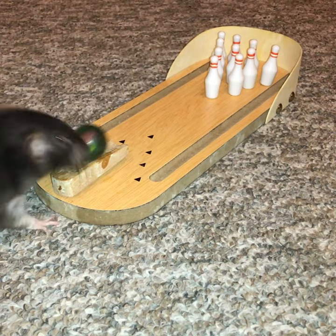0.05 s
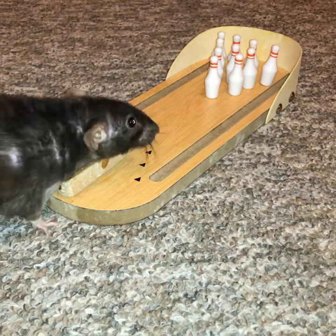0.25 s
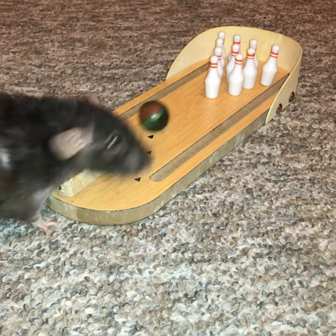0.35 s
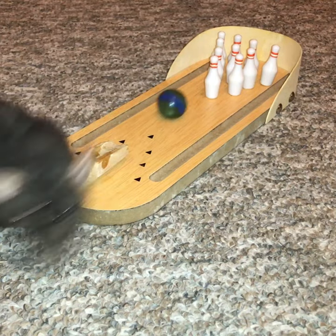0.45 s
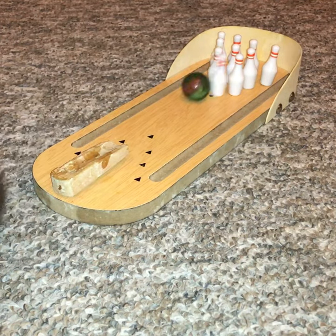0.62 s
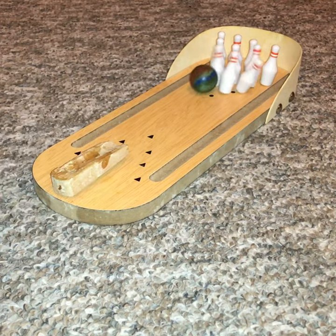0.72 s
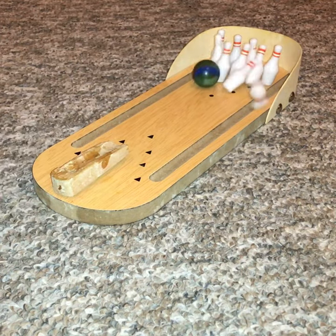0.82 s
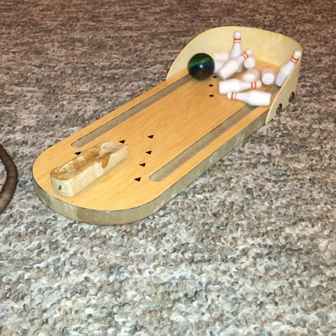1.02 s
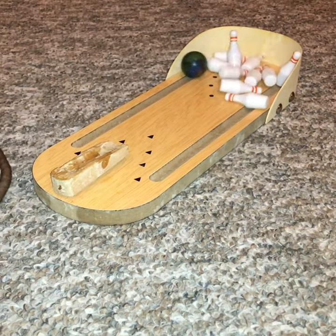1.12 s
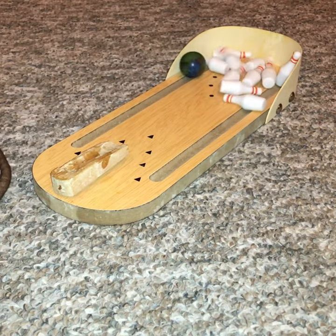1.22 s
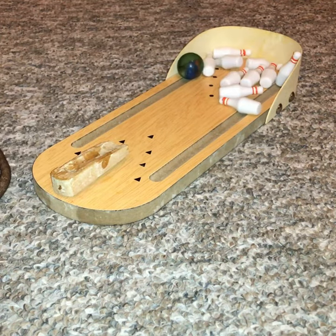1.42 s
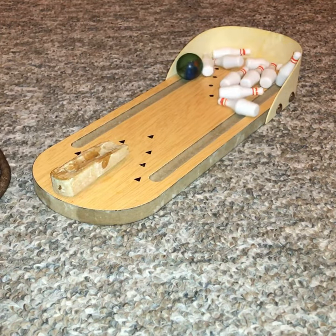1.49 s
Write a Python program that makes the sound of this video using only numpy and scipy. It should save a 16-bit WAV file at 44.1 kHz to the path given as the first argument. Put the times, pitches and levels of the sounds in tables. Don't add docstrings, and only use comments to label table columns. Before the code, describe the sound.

Tabletop-size bowling heard up close in a quiet room: soft animal shuffling on carpet, a sharp wooden knock with shrinking bounces, brief rolling and claw ticks, then wooden pins clack, tumble and settle.

```python
import sys
import numpy as np
from scipy import signal
from scipy.fft import rfft, irfft
from scipy.io import wavfile
from scipy.ndimage import uniform_filter1d

SR = 44100
rng = np.random.default_rng(int(sys.argv[2]) if len(sys.argv) > 2 else 0)


def decibels_to_gain(level_db):
    exponent = np.asarray(level_db, float) / 20
    return 10 ** exponent


def transcribe(u):
    v = np.clip(np.atleast_2d(u).T, -1, 1)
    q = np.round(v * 32767).astype(np.int16)
    wavfile.write(sys.argv[1], SR, q)


N = 68355

# (frequency [Hz], level [dB])
LANE_MODES = [(135, -20), (230, -19), (320, -18), (405, -9.5), (646, -8.5), (1035, -2.5), (1500, -3),
              (1800, -5.5), (2300, -6), (2900, -6), (3155, 1), (3450, -3), (3950, -11.5), (4700, -12.5)]


def evened(x):
    return x / np.sqrt(np.mean(x ** 2) + 1e-20)


def read(points, hz):
    f, value = np.transpose(points)
    return np.interp(np.log(hz + 1), np.log(f + 1), value)


def level(curve):
    s, db = np.transpose(curve)
    return decibels_to_gain(np.interp(np.arange(N) / SR, s, db, -150, -150))


def add(mix, s, sound):
    part = mix[round(s * SR):][:len(sound)]
    part += sound[:len(part)]


def coloured(tone):
    spectrum = rfft(rng.standard_normal(N))
    return evened(irfft(spectrum * decibels_to_gain(read(tone, np.fft.rfftfreq(N, 1 / SR))), N))


def wander(smooth):
    return evened(uniform_filter1d(rng.standard_normal(N), size=smooth))


def band_noise(count, low_hz, high_hz):
    b, a = signal.butter(3, [low_hz, high_hz], "band", fs=SR)
    return signal.lfilter(b, a, rng.standard_normal(count))


def ring(modes, t60_s, ref_hz, spread_db, detune, chatter):
    damping, chatter_s = 0.2, 0.002
    t = np.arange(2048)[:, None] / SR
    hz, db = np.transpose(modes)
    strength, shift, phase = rng.standard_normal((len(modes), 3)).T
    t60 = t60_s * (hz / ref_hz) ** -damping
    decay = decibels_to_gain(db + spread_db * strength - 60 * t / t60)
    onset = np.minimum(t * np.maximum(hz * 0.5, 450), 1)
    turn = 2 * np.pi * hz * (1 + detune * shift) * t + 0.5 * phase
    x = (decay * np.sin(turn) * onset).sum(1)
    touch = chatter * rng.standard_normal(256) * np.exp(-t[:256, 0] / chatter_s)
    touch *= rng.random(256) < 0.1
    touch[0] = 1
    x = np.convolve(x, touch)
    return x / abs(x).max()


def crack(length_s, low_hz=5500, high_hz=13500):
    t = np.arange(1024) / SR
    x = band_noise(1024, low_hz, high_hz) * np.exp(-t / length_s * 2)
    return x / abs(x).max()


def ping(hz, t60_s):
    t = np.arange(4096) / SR
    return decibels_to_gain(-60 * t / t60_s) * np.minimum(t / 0.00057, 1) * np.sin(2 * np.pi * hz * t)


def struck(modes):
    squash_s, rebound_s, rebound_db = 0.0017, 0.002638, -8.5
    t = np.arange(4096)[:, None] / SR
    hz, db, t60 = np.transpose(modes)
    tones = np.sin(2 * np.pi * (hz * t + rng.random(len(hz))))
    x = (decibels_to_gain(db - 60 * t / t60) * tones).sum(1) * np.minimum(t[:, 0] / squash_s, 1)
    b, a = signal.butter(2, 2400, "high", fs=SR)
    second = signal.lfilter(b, a, x)[:-200]
    add(x, rebound_s, decibels_to_gain(rebound_db) * second)
    return x / abs(x).max()


def still_air():
    # (frequency [Hz], level [dB])
    air_tone = [(100, -6), (600, -14), (1300, -20), (3000, -23), (8000, -25), (14000, -31.5), (16000, -36)]
    air_db, rise_db = -72.5, 6
    return decibels_to_gain(air_db + rise_db * (np.arange(N) / N - 1.0)) * coloured(air_tone)


def shuffle():
    # (time [s], level [dB])
    shuffle_curve = [
        (0, -64.5),
        (.17, -66.5),
        (.6, -68.5),
        (1.0, -68),
        (1.4, -74),
        (1.55, -75.5),
    ]
    # (frequency [Hz], level [dB])
    carpet_tone = [(30, -15), (60, -4), (120, 8), (200, 4.5), (330, 2.5), (500, -2.5), (1500, -46)]
    lumps = decibels_to_gain(2.5 * wander(600))
    return level(shuffle_curve) * evened(lumps * coloured(carpet_tone))


def claws():
    # (time [s], peak level [dB], centre frequency [Hz])
    claw_ticks = [(.596, -43.5, 7660), (0.5969, -44, 3780), (0.6228, -49, 4860), (0.6523, -50, 3600),
                  (0.662, -49, 5340), (.691, -49.5, 3860), (.705, -58, 2470), (0.733, -42.5, 4330),
                  (0.7422, -50, 4400), (0.763, -48.5, 3900), (0.769, -48, 3670)]
    out, t = np.zeros(N), np.arange(512) / SR
    for s, db, hz in claw_ticks:
        tick = np.sin(2 * np.pi * hz * t) * t / 0.00033 * np.exp(1 - t / 0.00019)
        grit = band_noise(512, hz * 0.3, hz * 1.5) * np.exp(-t / 0.0015)
        add(out, s, decibels_to_gain(db) * (tick + 0.5 * grit))
    return out


def roll():
    # (time [s], level [dB])
    roll_curve = [(.06, -85), (.19, -77.5), (.225, -68), (.36, -59.5), (.45, -65), (.65, -65), (.78, -71),
                  (1.3, -62), (1.40, -68)]
    # (frequency [Hz], level [dB])
    rub_tone = [(150, -0.5), (400, 4), (750, 11.5), (1800, -3), (2400, -5), (3200, -15), (6000, -16),
                (9000, -43)]
    body_db, lane_t60_s = -9, 0.063
    lane = ring(LANE_MODES, lane_t60_s, 1000, 3.0, 0.0061, 0)
    body = evened(signal.oaconvolve(rng.standard_normal(N), lane)[:N])
    z = signal.stft(coloured(rub_tone) + decibels_to_gain(body_db) * body, nperseg=512)[2]
    patches = uniform_filter1d(rng.standard_normal(z.shape), size=3, axis=0)
    patches = evened(uniform_filter1d(patches, size=4, axis=1))
    rubbing = signal.istft(z * decibels_to_gain(3.5 * patches), nperseg=512)[1][:N]
    bumps = decibels_to_gain(1.8 * wander(150))
    return level(roll_curve) * bumps * rubbing


def pin(top_db=0):
    # (frequency [Hz], level [dB])
    pin_modes = [(2030, -9), (2500, -8), (2975, -4.5), (3220, -2), (3430, -11), (4010, -0.5), (4110, -3),
                 (4670, -9), (5130, -5), (5600, -15)]
    modes = [(hz, db + top_db * (hz > 3700)) for hz, db in pin_modes]
    return ring(modes, 0.025 * rng.uniform(0.7, 1.2), 4000, 2.5, 0.007, 0.1)


def rattle(count=16):
    # (time [s], level [dB])
    rattle_curve = [(.795, -46), (.9, -52), (1.0, -39), (1.07, -46.5), (1.2, -47), (1.33, -58), (1.38, -56),
                    (1.40, -97)]
    touches_per_s, spread_db = 610, 4.0
    size = decibels_to_gain(spread_db * np.minimum(rng.exponential(1, N), 4))
    size *= rng.random(N) < touches_per_s / SR
    which, out = rng.integers(0, count, N), np.zeros(N)
    for k in range(count):
        tap = pin() + decibels_to_gain(6.5) * ring(LANE_MODES[1:9], 0.0087, 1100, 2.75, 0.097, 0.14)
        add(tap, 0, decibels_to_gain(-36) * crack(0.002))
        add(tap, 0, decibels_to_gain(-0.5) * crack(0.0054, low_hz=1080, high_hz=6040))
        out += signal.oaconvolve(size * (which == k), tap)[:N]
    return level(rattle_curve) * evened(out)


def pins():
    # (time [s], peak level [dB], crack share [dB], upper modes [dB])
    clacks = [(.7965, -27.5, -12, -4), (.8128, -27, -16, -4), (.8214, -30, -6.5, 0), (.8355, -36, -28, -10),
              (.8432, -25, -32, -1.5), (.8495, -22, -15, 4.5), (.8836, -20, -17, 0.5),
              (.9068, -32.5, -14, 5), (.9247, -26, -20, -2), (.931, -24, -17, -9), (.9548, -25, -7.5, -8),
              (.9585, -29.5, -21, -1), (.9692, -34, -12, -7.5), (.9735, -27.5, -7, -1),
              (.9765, -28, -5, -13), (.9831, -13.5, -19.5, 6.5), (1.0012, -37, -21, -8.5),
              (1.0045, -26, -18, 3), (1.0085, -33, -9, -4), (1.0125, -23.5, -29, -4),
              (1.016, -38, -20.5, -9.5), (1.022, -23, -8.5, -7), (1.0255, -29, -18, -8),
              (1.0346, -20.5, -22, -3.5), (1.039, -25.5, -27, 2), (1.0497, -26, -23, -3),
              (1.059, -31, -37, 2), (1.0744, -14.5, -26.5, -2.5), (1.1112, -28.5, -14, -11),
              (1.114, -39, -14, 9), (1.124, -36.5, -8, -21), (1.135, -19.5, -25, -6.5),
              (1.1395, -29, -16, 19), (1.153, -36.5, -17, -2)]
    # (time [s], peak level [dB], crack share [dB], upper modes [dB])
    falls = [(1.1745, -21, -24, -6.5), (1.194, -32, -33, 3), (1.2003, -24.5, -18, 0.5),
             (1.204, -32.5, -20, -2), (1.2253, -26.5, -24, 2), (1.2374, -19, -32, 2), (1.2512, -30, -13, 2),
             (1.2646, -22.5, -21, 3), (1.272, -37, 1.5, -21), (1.2946, -27.5, -31, -1),
             (1.309, -32.5, -29, -3.5), (1.3228, -29.5, -37, 3), (1.342, -39.5, -36, -10)]
    # (time [s], peak level [dB], frequency of the answering mode [Hz])
    touches = [(0.859, -43, 3230), (0.8707, -48, 3400), (0.8736, -47, 3980), (0.9, -34, 5200),
               (0.9166, -43, 4130), (0.9225, -33, 1500), (0.9416, -33, 3080), (0.9468, -30, 3220),
               (0.9628, -29, 4000), (0.9666, -32, 1360), (0.9966, -51, 2100), (1.0297, -35, 4070),
               (1.0449, -31, 3980), (1.0661, -23, 3300), (1.091, -40, 3880), (1.1002, -36, 4000),
               (1.103, -51, 4040), (1.121, -43, 3050), (1.1645, -50, 3100), (1.1827, -36, 2050),
               (1.1895, -50, 3100), (1.2097, -48, 1220), (1.2192, -33.5, 1360), (1.2865, -57, 1820),
               (1.2907, -42, 1510), (1.317, -53, 3930), (1.329, -53, 4000), (1.3363, -45, 4040),
               (1.3482, -56, 4150), (1.3537, -47, 3120), (1.378, -54, 1360)]
    # (time [s], peak level [dB])
    thuds = [(0.844, -37.5), (.884, -32), (0.93, -35.5), (1.0736, -34.5), (1.1304, -28), (1.1748, -43),
             (1.2086, -30), (1.2645, -33), (1.306, -37.5), (1.336, -40.5), (0.5151, -49.5), (.597, -48.5),
             (.619, -57.5), (0.706, -53)]
    # (time [s], peak level [dB], frequency [Hz], t60 [s])
    knocks = [
        (0.985, -33.5, 390, 0.031),
        (1.049, -25.5, 2086, 0.018),
        (1.1312, -43.5, 1028, 0.076),
        (1.209, -42, 970, 0.096),
        (1.275, -28, 1500, 0.029),
        (1.458, -60.5, 1363, 0.057),
        (1.513, -63.5, 1442, 0.043),
    ]
    out = np.zeros(N)
    for s, db, crack_db, top_db in list(clacks) + list(falls):
        add(out, s, decibels_to_gain(db) * pin(top_db))
        add(out, s, decibels_to_gain(db + crack_db) * crack(0.005))
        add(out, s, decibels_to_gain(db - 10) * crack(0.0047, low_hz=1130, high_hz=5410))
    for s, db, hz in touches:
        add(out, s, decibels_to_gain(db) * ping(hz, 0.011))
        add(out, s, decibels_to_gain(db - 5.5) * crack(0.004, low_hz=1200, high_hz=5700))
    for s, db in thuds:
        add(out, s, decibels_to_gain(db) * ring(LANE_MODES[:8], 0.034, 1000, 2.9, 0.016, 0.25))
        add(out, s, decibels_to_gain(db - 2.5) * crack(0.011, low_hz=150, high_hz=1490))
    for s, db, hz, t60_s in knocks:
        add(out, s, decibels_to_gain(db) * ping(hz, t60_s))
    return out


def ball():
    # (time [s], peak level [dB])
    bounces = [
        (.2206, -9),
        (.2712, -17),
        (.2978, -22),
        (.3145, -26),
    ]
    # (frequency [Hz], level [dB], t60 [s])
    landing_modes = [(135, -21.5, 0.075), (335, -19.5, 0.031), (405, -9, 0.024), (665, -12, 0.045),
                     (1028, -5.5, 0.044), (1458, -14, 0.042), (1836, -6, 0.043), (2060, 1, 0.015),
                     (6120, -16.5, 0.0148), (2790, -8, 0.019), (3180, 3.5, 0.015), (3470, 0, 0.015),
                     (3978, -7.5, 0.041), (5445, -5, 0.013)]
    # (frequency [Hz], level [dB], t60 [s])
    rebound_modes = [(139, -14.5, 0.065), (402, 2, 0.018), (665, -5, 0.045), (1021, -2, 0.043),
                     (1360, -10, 0.059), (1540, -4.5, 0.024), (1825, -3, 0.026), (7300, -19, 0.017),
                     (2413, -10.5, 0.035), (2940, 4, 0.025), (3470, -10.5, 0.017), (4130, -16, .02),
                     (4710, -6, .02), (5490, -5, 0.018)]
    # (frequency [Hz], level [dB], t60 [s])
    hop_modes = [(444, 0, .04), (688, -6, 0.058), (1040, -3.5, 0.036), (1442, -4.5, 0.032),
                 (1720, -5.5, 0.041), (2007, -3, 0.031), (3230, -7, 0.038), (3950, -8.5, 0.034),
                 (5450, -12, .025)]
    # (time [s], peak level [dB])
    chimes = [(.596, -59), (.612, -54), (.813, -40.5), (.822, -47), (.848, -38), (.884, -42.5),
              (.9705, -51), (0.983, -41.5), (1.007, -47), (1.028, -44), (1.176, -47), (1.225, -49.5)]
    hop_s, hop_db = 0.4405, -35.5
    chime_hz, chime_t60_s, chime_grain_db = 9170, 0.035, 5
    out, landing, rebound = np.zeros(N), struck(landing_modes), struck(rebound_modes)
    for k, (s, db) in enumerate(bounces):
        add(out, s, decibels_to_gain(db) * (rebound if k else landing))
        add(out, s + 0.00055, decibels_to_gain(db - 24) * crack(0.009))
        add(out, s + 0.0013, decibels_to_gain(db - 16.5) * crack(0.0077, low_hz=1200, high_hz=5970))
        add(out, s + 0.0011, decibels_to_gain(db - 17.5) * crack(0.011, low_hz=170, high_hz=424))
    add(out, hop_s, decibels_to_gain(hop_db) * struck(hop_modes))
    for s, db in chimes:
        grain = evened(uniform_filter1d(rng.standard_normal(4096), size=70))
        add(out, s, decibels_to_gain(db + chime_grain_db * grain) * ping(chime_hz, chime_t60_s))
    return out


def room(x):
    # (delay [s], level [dB])
    near_echoes = [(.0026, -17.5)]
    # (frequency [Hz], t60 [s])
    room_decay = [(200, 0.059), (1000, 0.23), (4000, 0.29), (12000, 0.25)]
    tail_db = -10
    taps = np.zeros(SR // 2)
    at = np.arange(300, SR // 2 - 20, 20)
    taps[at + rng.integers(0, 20, len(at))] = rng.choice([-1., 1.], len(at))
    hz, t, z = signal.stft(taps, SR, nperseg=256)
    fade = decibels_to_gain(-60 * t / read(room_decay, hz)[:, None])
    tail = signal.istft(z * fade, SR, nperseg=256)[1]
    path = decibels_to_gain(tail_db) * tail / np.linalg.norm(tail)
    path[0] += 1
    for k, (s, db) in enumerate(near_echoes):
        path[round(s * SR)] += (-1) ** k * decibels_to_gain(db)
    return signal.fftconvolve(x, path)[:N] * 0.7


def scene():
    air, carpet, ticks, rolling = still_air(), shuffle(), claws(), roll()
    in_room = room(ball() + pins() + rattle() + 2.7 * ticks)
    return (in_room + ticks + rolling + carpet + air)[None]


def low_pass(x):
    return signal.sosfilt(signal.butter(12, 16510, fs=SR, output="sos"), x)


def record(dry):
    band = signal.butter(11, [47, 15900], "band", fs=SR, output="sos")
    return low_pass(signal.sosfilt(band, dry))


dry = scene()
out = record(dry)
transcribe(out)
```